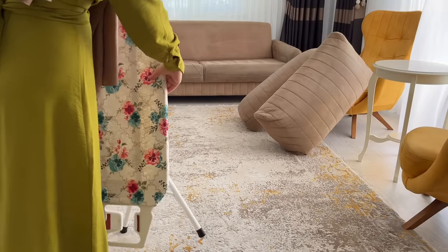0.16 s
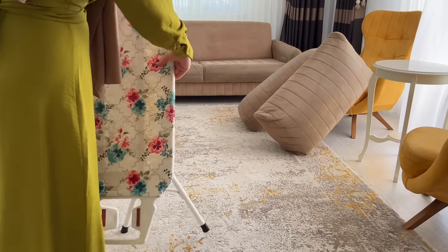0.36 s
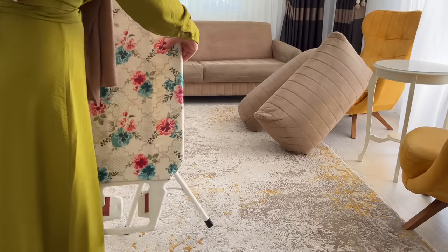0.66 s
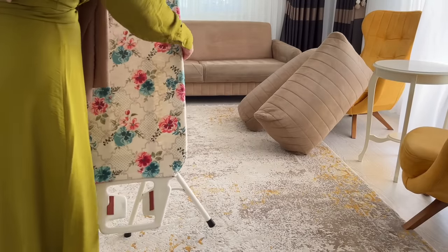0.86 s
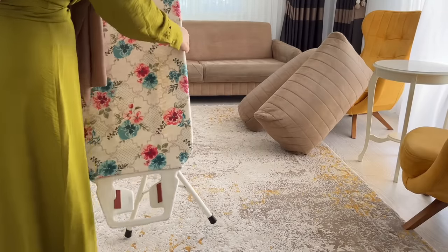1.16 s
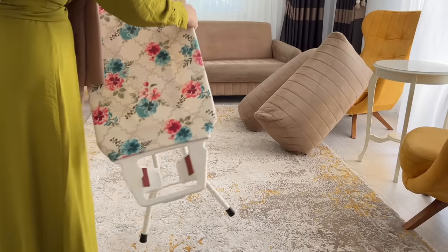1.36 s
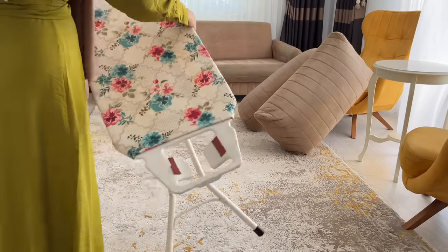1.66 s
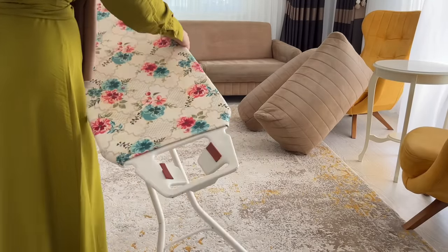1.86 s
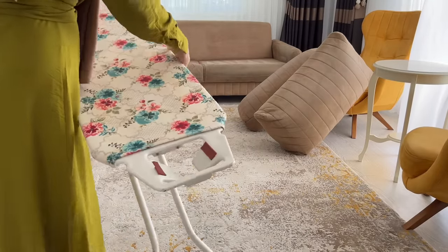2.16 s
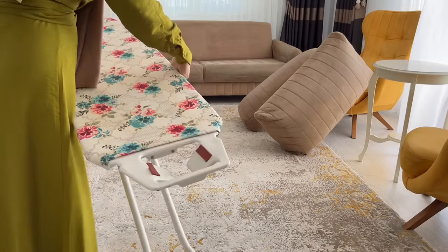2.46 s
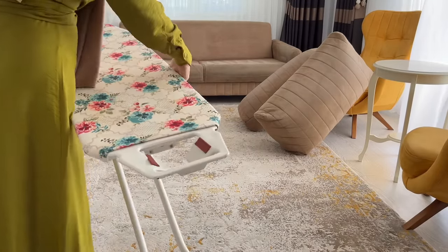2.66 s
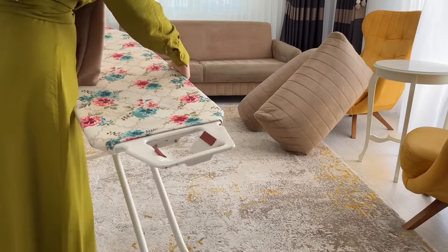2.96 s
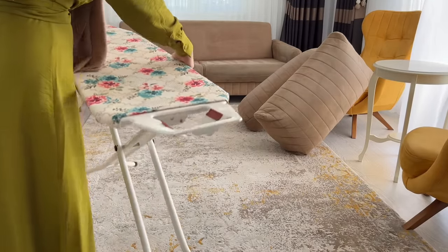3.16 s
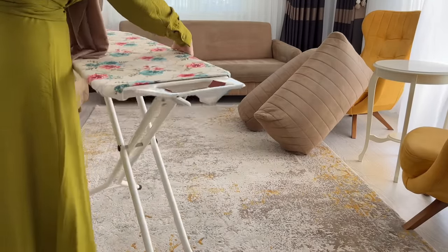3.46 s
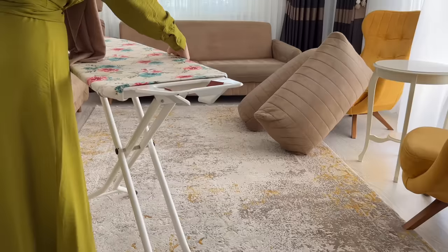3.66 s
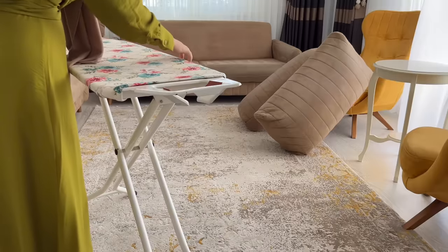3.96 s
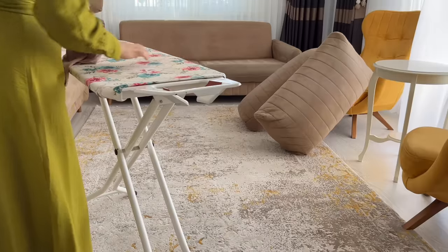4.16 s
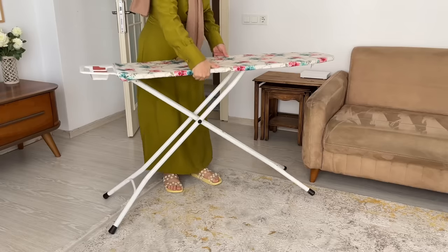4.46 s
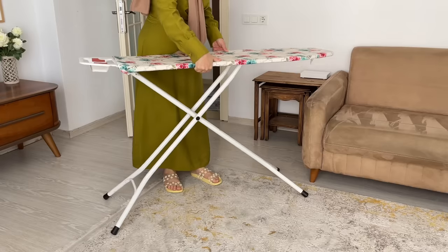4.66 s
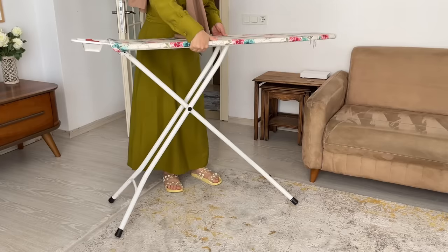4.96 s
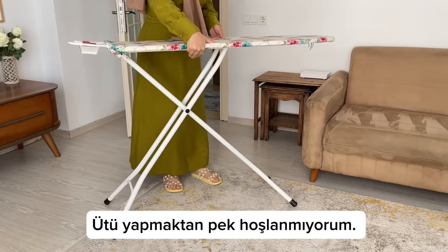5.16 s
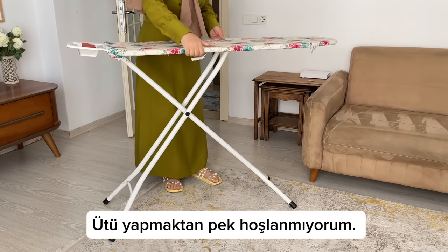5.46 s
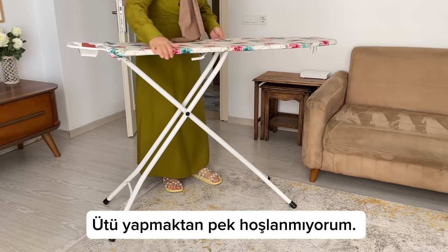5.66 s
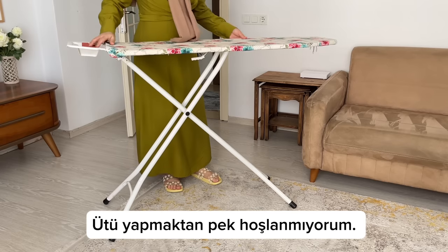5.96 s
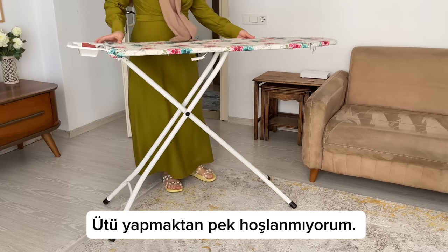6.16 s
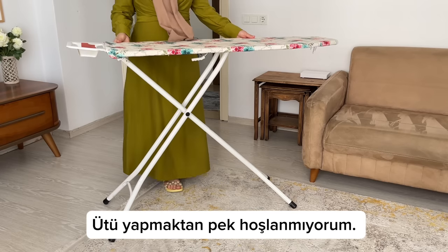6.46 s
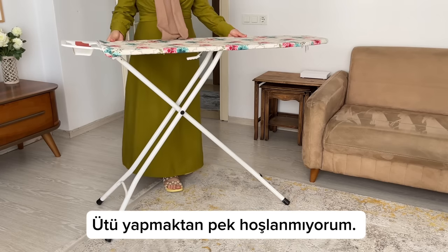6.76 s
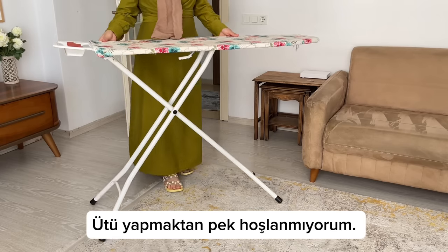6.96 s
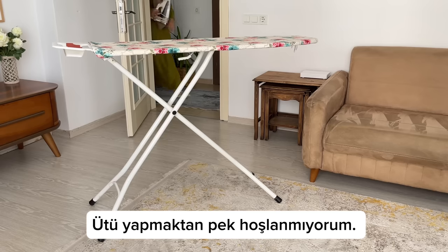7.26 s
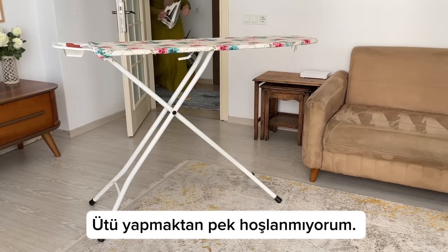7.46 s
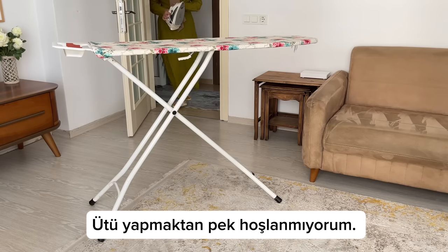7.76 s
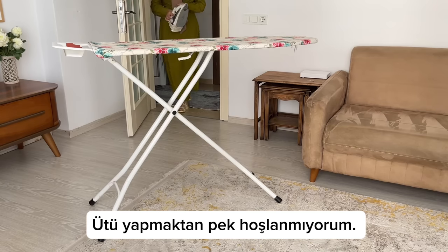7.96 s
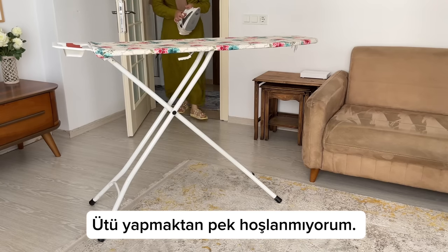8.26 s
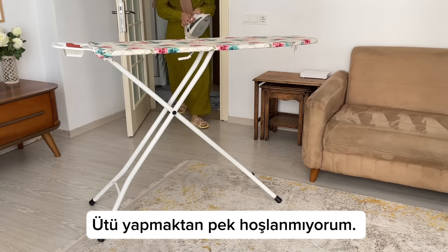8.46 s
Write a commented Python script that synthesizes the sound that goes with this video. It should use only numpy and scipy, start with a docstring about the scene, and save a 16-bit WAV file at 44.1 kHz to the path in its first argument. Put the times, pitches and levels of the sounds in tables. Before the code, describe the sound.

Metal legs scrape, catch and knock as an ironing board is set up in a living room; cloth rustles, soft footsteps follow over a faint low hum.

```python
"""Unfolding a steel ironing board

In a carpeted living room a leg bar scrapes along its rail in strokes, catches, knocks and rings faintly.
Scrapes are dense random contacts, blows are clicks with a dying rattle, and both ring the steel frame.
A foot lands as a falling tone; noise makes the rustling cloth, slipper steps, a short click at 7.02 s
and the room tone; sines make the hum. Reflections follow the direct sound, and the two channels
share part of the sound.
"""
import sys
import numpy as np
from scipy import signal
from scipy.fft import rfft, irfft, next_fast_len
from scipy.io import wavfile

SR = 44100
rng = np.random.default_rng(int(sys.argv[2]) if len(sys.argv) > 2 else 0)


def wav_record(signal):
    """Record a signal, one row per channel, as 16-bit PCM in the file named by sys.argv[1]."""
    frames = np.transpose(np.atleast_2d(signal))
    bounded = np.clip(frames, -1, 1)
    # unit amplitude maps onto the largest positive 16-bit level
    quanta = np.round(bounded * 32767).astype(np.int16)
    wavfile.write(sys.argv[1], SR, quanta)


N = 380141
SIZE = next_fast_len(N + SR)                            # transform length, with room for tails
HZ = np.maximum(np.arange(SIZE // 2 + 1) * SR / SIZE, 1)

# Levels are those of each source, before its filters and the room.
# Scrapes, blows and cloth have up to five parts, low to high: boom, knock, clang, body, hiss.
# Part levels are relative to the body; dullness raises the low parts.
BOOM_HZ, KNOCK_HZ, CLANG_HZ, HISS_HZ = 454, 1074, 2840, 7460   # crossovers between the parts

# room tone over time: time_s, middle_db, bass_db
TONE_LEVELS = [(0.0, -50, -54.5), (1.5, -52.5, -54.5), (2.4, -51, -50), (4.2, -50.5, -52),
               (5.4, -48.5, -55.5), (6.5, -48, -55), (6.9, -47, -51), (8.62, -46, -55)]
# colour of the room tone: pitch_hz, level_db (per Hz)
TONE_SPECTRUM = [(24, -36.5), (41, -3.5), (65, 0.5), (100, -1), (160, -6.5), (250, -11), (500, -17),
                 (790, -20), (1200, -19), (2000, -28.5), (3200, -37), (5000, -43), (7000, -60),
                 (12000, -61.5)]

# the hum over time: time_s, level_db
HUM_LEVELS = [(0.0, -45), (0.24, -54), (0.38, -36), (0.55, -52), (0.67, -36.5), (0.8, -50), (1.25, -47.5),
              (1.6, -51), (1.68, -40), (1.8, -53.5), (2.09, -39.5), (2.4, -44), (2.7, -48.5), (3.3, -46.5),
              (3.6, -54.5), (3.9, -48), (4.2, -56), (4.27, -41), (4.47, -40), (4.73, -48), (4.95, -40),
              (5.4, -40.5), (5.7, -35), (5.8, -41.5), (6.36, -38.5), (6.55, -56.5), (6.74, -43),
              (6.96, -38), (7.06, -46.5), (7.75, -52.5), (8.14, -44), (8.62, -45)]
# the hum's octave over time: time_s, level_db
OCTAVE_LEVELS = [(0, -63), (4.2, -60), (5.35, -57.5), (5.45, -51), (5.9, -49), (6.7, -52), (6.8, -65),
                 (8.62, -60.5)]
# settings of hum and ringing, which switch abruptly at each start:
# start_s, hum_hz, phase_waver_rad, upper_tone_hz, upper_tone_db, tube_drive_db, frame_ring_db
HUM_AND_RING_SETTINGS = [(0, 62.6, 0.49, 188, -77.5, -74.5, -45), (4.25, 69.6, .45, 206, -58, -84, -43),
                         (7.02, 64.63, .8, 203.5, -56, -88, -45)]

# clothes and hands on the cover, each a swell: peak_s, rise_s, fall_s, level_db, hiss_db
SWELLS = [(0.18, 0.24, .1, -63, -20), (0.93, 0.11, 0.2, -68, -9), (1.04, 0.027, 0.13, -61.5, -21),
          (1.88, .05, .03, -57, -16), (2.34, .1, .3, -65, -9), (2.46, .04, .15, -63, -10),
          (2.84, .03, 0.33, -64, -21), (2.96, .03, 0.19, -64, -20), (4.14, .15, 0.14, -82, 6),
          (5.321, .1, 0.32, -67, -20), (5.8, 0.47, 0.57, -56.5, -6.5), (6.1, .2, .2, -74.5, -3),
          (6.66, .04, 0.63, -67, -10), (6.93, 0.22, .12, -70.5, -3.5), (7.23, .06, 0.13, -73.5, 2.5),
          (7.68, 0.062, 0.26, -66, -10.5), (7.83, .03, 0.25, -73, -5), (8.04, .05, 0.12, -83, -6),
          (8.42, .04, 0.21, -75, -5), (8.54, 0.027, .15, -74, -15.5)]
SWELL_EDGE_DB = 26                                      # drop at one rise or fall time from the peak
SWELL_ROUND = 1.4                                       # 1 = pointed swell, 2 = bell
REST_DB, REST_HISS_DB = -88.0, -16                      # cloth between swells; hiss against that

# slipper steps, and a short click at 7.02 s where the sound switches abruptly:
# start_s, level_db, dullness_db, hiss_db
STEPS_AND_CLICK = [(6.499, -71.5, 30.5, -4), (6.6192, -33, 5.5, 6), (7.0198, -61, 10, 0.3),
                   (7.2624, -66, 20, 3), (7.675, -44, 15.5, 4.5), (8.3588, -69, 31, -8),
                   (8.4087, -54.5, 15, -0.6), (8.5283, -60, 18, -12.5)]
# boom, knock and clang of a blow, and how far each follows the dullness
STEP_PARTS_DB, STEP_DULL_SHARE = [0.3, 1, 9], [0.95, 1, 0.11]
KNOCK_PARTS_DB, KNOCK_DULL_SHARE = [-2, -2, -2], [0.91, 1, 0.5]

# a foot of the board lands on the carpet, one row:
# start_s, level_db, first_hz, last_hz, pitch_fall_s (time constant), t60_s
FOOT_LANDING = (2.5315, -20, 900, 270, .0032, .11)

# knocks and catches of the frame: start_s, level_db, dullness_db, hiss_db
FRAME_KNOCKS = [(0.2467, -24.5, -12.5, 2), (0.2665, -23, 0, 8), (0.62, -16, -2.5, 7),
                (0.7427, -18.5, -10.5, 4.5), (1.0228, -49.5, 13, -4), (1.6536, -61, 6, 7),
                (1.8974, -12, -6.5, 8), (1.9485, -17, -3.5, 7.5), (1.988, -18.5, -1, 4.5),
                (2.0262, -16, -2, 8.5), (2.0577, -9.5, -4, 3.5), (2.1102, -16, -8, 3),
                (2.1333, -14, -1, -1.5), (2.4335, -42.5, -8, 8), (2.5115, -39.5, 11.5, 1.5),
                (2.5386, -25, 5, 1.5), (2.6483, -36, 13, -9), (2.8228, -44.5, 14, -11),
                (2.9439, -50, 15, -14), (2.9896, -37.5, 7, -1.5), (3.021, -34.5, 5, -2.5),
                (3.0631, -23.5, -2, 8), (3.3918, -30.5, 12.5, 7.5), (3.492, -32, 5.5, 12),
                (4.519, -36.5, 4, -11), (4.5685, -29, -8, 5), (4.6402, -28.5, 3, 0.3),
                (4.7016, -30, -9.5, 8.5), (4.8524, -26.5, 4, 3), (5.0427, -24.5, 2, 12.5),
                (5.1599, -19, -4, 7), (5.3951, -58, 9, -8), (5.4325, -55, 9, -9), (6.0727, -56.5, 10, 4),
                (6.3575, -55, 15, 0.3), (6.8942, -52, 2.5, -8)]

# slides of the bar on its rail:
# start_s, rise_s, stop_s, first_db, last_db, dullness_db, clang_db, hiss_db, hollow_drive_db
BAR_SLIDES = [(0.16, 0.055, 0.28, -46, -39.5, 2, 2.5, -1, -56),
              (0.23, 0.058, .54, -24, -20.5, -0.1, 0.5, 7.5, -56.5),
              (0.5, 0.017, 0.67, -21, -26.5, 2, 3.5, 6.5, -57),
              (0.74, .006, 0.77, -29, -32.5, -0.5, 1, 6.5, -49),
              (1.888, 0.0082, 1.99, -21, -32, -0.5, 0.9, 4.5, -56.5),
              (1.97, 0.051, 2.1546, -26, -18.5, 0, 0.9, 6.5, -57.5),
              (2.529, 0.0067, 2.7, -37, -57.5, 11.5, 5.5, -1, -52),
              (2.95, 0.11, 3.14, -33.5, -26.5, 1.3, -0.3, 8.5, -55),
              (3.15, 0.018, 3.345, -29.5, -32, -0.5, -0.5, 7.5, -52),
              (3.488, 0.0053, 3.514, -51, -47.5, 9.5, 3, 10, -49),
              (4.246, 0.0061, 4.381, -25.5, -31, -1.5, 2, 8.5, -38),
              (4.5, .02, 4.76, -42, -29, 1.5, 2.5, 5, -51.5),
              (4.74, 0.033, 4.985, -28, -30.5, 0.3, 2, 8, -56.5),
              (5.035, 0.0084, 5.124, -34.5, -36, 3.5, -0.5, 7.5, -45),
              (5.154, 0.0061, 5.16, -14.5, -26, 1.5, 4, 7.5, -52)]
RISE_DB = 39.5                                          # a slide grows from this far below first_db
# fading speed after a slide stops, for boom, knock, clang, body, hiss: fade_db_per_s
SLIDE_FADES = [170., 256, 300., 310., 330.]
# boom and knock of a slide: level_db
SLIDE_LOW_PARTS = [1, 0.3]
# how far boom and knock follow the dullness: share
SLIDE_LOW_SHARES = [1.3, 0.9]

# colour of steel on steel: pitch_hz, level_db (per Hz)
STEEL_SPECTRUM = [(60, -15.5), (120, 0), (330, -7), (600, 2.5), (800, -1.5), (1300, -0.5), (2000, -0.5),
                  (3000, -1), (4700, 11.5), (6000, 1), (7200, -9), (10000, -14), (13000, -17.5),
                  (15700, -22.5)]
# modes (ringing tones) of frame and board: pitch_hz, drive_db, t60_s
FRAME_MODES = [(268, -15, 0.11), (327, -6.5, 0.13), (983, -16.5, 0.11), (1311.6, -5, 0.07),
               (1812, -11.5, 0.11), (1988, -11, 0.18), (2230, -21, .12), (2556, -24, .2), (3110, -9.5, .11),
               (3310, -14.5, 0.084), (3800, -18.5, .15), (4080, -13.5, .15), (4360, -12, 0.1),
               (4780, -15.5, 0.14), (4910, -20, 0.087), (5170, -13, 0.14), (5630, -17.5, .15)]
# two close, beating modes of the free leg tube: pitch_hz, t60_s
TUBE_MODES = [(3995, 1.0), (3992.4, 1.0)]
# modes of the hollow under the cover: pitch_hz, t60_s
HOLLOW_MODES = [(555, 0.1), (630, 0.07)]
KNOCK_HOLLOW_DB = -52.5                                 # how strongly knocks drive the hollow

# how long reflections last: pitch_hz, t60_s
ROOM_DECAY = [(125, 0.89), (250, 0.35), (500, 0.26), (1000, 0.26), (2000, .27), (4000, 0.26), (8000, 0.17),
              (14000, 0.13)]
# right channel against left channel: pitch_hz, likeness (0 to 1), phase_rad, left_louder_db
CHANNEL_PAIR = [(75, .98, 0, 1.8), (130, .94, 0, 2.7), (290, .8, 0, 3.2), (640, .35, 0, 4),
                (1400, .1, -.3, 1.5), (2100, .5, -.6, 2.2), (2800, .7, -1.1, 4), (3500, .62, -1.15, 6),
                (4500, .42, -.75, 8.4), (5500, .35, .4, 6.5), (6200, .55, 1.1, 3.5), (7000, .6, 1.6, 1.5),
                (7450, .75, 2.6, .5), (7650, .997, 3.14, 0), (9000, .997, 3.14, 0), (9400, .6, 4.0, 0),
                (10400, .6, 5.1, 0), (11000, .99, 6.28, 0), (13100, .99, 6.28, 0), (13600, .3, 7.6, 0),
                (14200, .95, 9.42, 0)]
CUTOFF_HZ = 15800


def amp(db):
    """Turn decibels into gain."""
    return 10 ** (np.asarray(db) / 20)


def unit(x):
    """Scale to rms 1."""
    return x / np.sqrt(np.mean(x ** 2) + 1e-20)


def in_time(rows):
    """Join the points of a time table with straight lines, one value per sample."""
    s, *columns = np.transpose(rows)
    return np.array([np.interp(np.arange(N) / SR, s, c) for c in columns])


def at_hz(points, hz=HZ):
    """Join the points of a frequency table along a logarithmic axis."""
    f, *columns = np.transpose(points)
    return np.array([np.interp(np.log(hz), np.log(f), c) for c in columns])


def current_settings():
    """Give the hum and ringing settings in force at every sample."""
    s, *columns = np.transpose(HUM_AND_RING_SETTINGS)
    row = np.searchsorted(s, np.arange(N) / SR, "right") - 1
    return np.array(columns)[:, row]


def drift(rate_hz):
    """Random slow wandering of rms 1: smoothed noise made at a twentieth of the sample rate."""
    r = np.exp(-40 * np.pi * rate_hz / SR)
    noise = rng.standard_normal(N // 20 + 4002)
    slow = signal.lfilter([1], [1, -2 * r, r * r], noise)[4000:]   # skip the filter's start-up
    return np.interp(np.arange(N) / 20, np.arange(len(slow)), unit(slow))


def colour(x, spectrum):
    """Filter to a dB shape without sounding early (minimum phase, by folding the cepstrum)."""
    cepstrum = irfft(at_hz(spectrum)[0] * np.log(10) / 20, SIZE)
    cepstrum[1:SIZE // 2] *= 2
    cepstrum[SIZE // 2 + 1:] = 0
    response = np.exp(rfft(cepstrum))
    return irfft(rfft(x, SIZE) * response, SIZE)[..., :N]


def joined(boom, knock, clang, body, hiss):
    """Cut each part to its own band, low to high, and add them."""
    parts = [(boom, BOOM_HZ, "low"), (knock, [BOOM_HZ, KNOCK_HZ], "band"),
             (clang, [KNOCK_HZ, CLANG_HZ], "band"), (body, [CLANG_HZ, HISS_HZ], "band"),
             (hiss, HISS_HZ, "high")]
    total = 0
    for x, hz, kind in parts:
        total = total + signal.sosfilt(signal.butter(3, hz, kind, fs=SR, output="sos"), x)
    return total


def parts_db(low_db, shares, dull_db, *upper_db):
    """Five part levels against the body: dullness shifts the low parts by their shares."""
    low_parts = np.array(low_db) + np.array(shares) * dull_db
    return np.array([*low_parts, *upper_db])


def grains(per_s, spread_db):
    """Random tiny contacts of uneven size and either sign, two unrelated draws."""
    unevenness = np.minimum(rng.exponential(1, (2, N)), 5)
    sizes = amp(spread_db * unevenness) * rng.choice([-1, 1], (2, N))
    touching = rng.random((2, N)) < per_s / SR
    return unit(sizes * touching)


def blows(table, low_db, shares, t60):
    """Each blow is a click and a short dying rattle; the click weighs most in the low parts."""
    out = np.zeros((5, 2, N + SR))
    t = np.arange(SR // 8) / SR
    rattles = rng.standard_normal((len(table), 2, len(t))) * amp(-60 * t / t60)
    click = np.array([8.3, 7.6, 2.8, 3.1, 2.2])[:, None, None] * (t == 0)
    for (s, level_db, dull_db, hiss_db), rattle in zip(table, rattles):
        i = round(s * SR)
        gain = amp(level_db + parts_db(low_db, shares, dull_db, 0, hiss_db))
        out[..., i:i + len(t)] += gain[:, None, None] * (rattle + click)
    return joined(*out[..., :N])


def ring(x, hz, t60):
    """One mode: a resonator in phase with its drive at its own pitch, dying 60 dB in t60 seconds."""
    r = amp(-60 / (max(t60, .01) * SR))
    w = 2 * np.pi * hz / SR
    return signal.lfilter([1, 0, -1], [1, -2 * r * np.cos(w), r * r], x + 1e-18)


def room_tone():
    """Dull noise from outside and the house, its bass and middle swelling apart."""
    middle_db, bass_db = in_time(TONE_LEVELS)
    noise = unit(colour(rng.standard_normal((2, N)), TONE_SPECTRUM))
    bass = signal.sosfilt(signal.butter(2, 400, fs=SR, output="sos"), noise)
    middle = noise - bass
    return amp(bass_db + 1.5 * drift(4.4)) * bass + amp(middle_db + 0.95 * drift(5.9)) * middle


def hum():
    """A low tone, its octave and an upper tone, all sines wavering in level and phase."""
    hz, waver, upper_hz, upper_db, *_ = current_settings()
    tones = [(hz, in_time(HUM_LEVELS)[0]), (2 * hz, in_time(OCTAVE_LEVELS)[0]), (upper_hz, upper_db)]
    total = 0
    for tone_hz, level_db in tones:
        gain = np.sqrt(2) * amp(level_db + 2.2 * drift(8.5))   # root 2 turns rms into peak
        phase = 2 * np.pi * np.cumsum(tone_hz) / SR + waver * drift(7.8)
        total = total + gain * np.sin(phase)
    return total


def rustle():
    """Fine soft fibres rub in clumps; each movement swells and dies."""
    t = np.arange(N) / SR
    body, hiss = amp(REST_DB), amp(REST_DB + REST_HISS_DB)
    for s, rise, fall, level_db, hiss_db in SWELLS:
        distance = np.where(t < s, (s - t) / rise, (t - s) / fall)
        swell = amp(level_db - SWELL_EDGE_DB * distance ** SWELL_ROUND)
        body = body + swell
        hiss = hiss + amp(hiss_db) * swell
    fibres = grains(per_s=20000, spread_db=-2.5) * amp(1.3 * drift(15.))
    soft = body * fibres
    return joined(0 * fibres, amp(0.1) * soft, amp(1.7) * soft, soft, hiss * fibres)


def steps_and_click():
    """Slipper steps and a short click at 7.02 s: clicks with dying noise, in the colour of the steel."""
    return colour(blows(STEPS_AND_CLICK, STEP_PARTS_DB, STEP_DULL_SHARE, t60=0.15), STEEL_SPECTRUM)


def landing():
    """A dull thud whose pitch drops as the bending wave spreads through the board."""
    s, level_db, first_hz, last_hz, fall, t60 = FOOT_LANDING
    t = np.maximum(np.arange(N) / SR - s, 0)
    extra_turns = (first_hz - last_hz) * fall * (1 - np.exp(-t / fall))
    phase = 2 * np.pi * (last_hz * t + extra_turns)
    return amp(level_db - 60 * t / t60) * np.sin(phase)


def knocks():
    """Steel knocks and catches: each is a click with a quickly dying rattle."""
    return blows(FRAME_KNOCKS, KNOCK_PARTS_DB, KNOCK_DULL_SHARE, t60=0.049)


def scrape():
    """Dense contacts stutter as the bar sticks and slips; returns the scrape and the hollow's drive."""
    grit = grains(per_s=11000, spread_db=2.0) * amp(2.0 * drift(30.) + 0.87 * drift(120.))
    gain, hollow_gain, t = np.zeros((5, 1, N)), np.zeros(N), np.arange(N) / SR
    for start, rise, stop, first_db, last_db, dull_db, clang_db, hiss_db, hollow_db in BAR_SLIDES:
        on = slice(round(start * SR), round(stop * SR) + SR // 3)   # leave time to fade
        times = [start, start + rise, max(stop, start + rise)]
        level_db = np.interp(t[on], times, [first_db - RISE_DB, first_db, last_db])
        fade_db = np.outer(SLIDE_FADES, np.maximum(t[on] - stop, 0))
        balance_db = parts_db(SLIDE_LOW_PARTS, SLIDE_LOW_SHARES, dull_db, clang_db, 0, hiss_db)
        parts = amp(level_db - fade_db + balance_db[:, None])
        gain[:, 0, on] = np.maximum(gain[:, 0, on], parts)   # the louder of overlapping slides
        hollow_gain[on] = amp(hollow_db)
    out = joined(*(gain * grit))
    return out, out * hollow_gain


def frame(x, hollow_drive):
    """Steel passes contact noise on and rings; each mode's drive wavers as the contact point moves."""
    *_, tube_db, ring_db = current_settings()
    rings = sum(ring(x * amp(drive_db + 2.6 * drift(4.)), hz, t60) for hz, drive_db, t60 in FRAME_MODES)
    tube = sum(ring(x * amp(tube_db), hz, t60) for hz, t60 in TUBE_MODES)
    hollow = sum(ring(hollow_drive, hz, t60) for hz, t60 in HOLLOW_MODES)
    return colour(x + amp(ring_db) * rings + tube + hollow, STEEL_SPECTRUM)


def room(x):
    """Direct sound plus a noise-like tail of reflections that dies band by band."""
    t, tail = np.arange(SR * 3 // 4) / SR, 0
    for hz, t60 in ROOM_DECAY:
        edges = [hz / np.sqrt(2), min(hz * np.sqrt(2), .45 * SR)]
        dying = rng.standard_normal((2, len(t))) * amp(-60 * t / t60)
        dying = dying * (t > .003)                      # reflections arrive after 3 ms
        tail = tail + signal.sosfilt(signal.butter(2, edges, "band", fs=SR, output="sos"), dying)
    tail = tail / np.sqrt(np.sum(tail ** 2, axis=1, keepdims=True))
    reflections = irfft(rfft(x, SIZE) * rfft(tail, SIZE), SIZE)[:, :N]
    return amp(-2.0) * x + amp(-7.0) * reflections


def scene():
    """Mix two channels; noise is drawn apart for each, the landing is common, the hum is in the first."""
    slides, hollow_drive = scrape()
    hits = knocks()
    board = frame(slides + hits, hollow_drive + amp(KNOCK_HOLLOW_DB) * hits) + landing()
    indoors = room(board + steps_and_click() + rustle())
    return indoors + room_tone() + hum() * [[1], [0]]


def record(dry):
    """The two channels share part of the sound, turned in phase on the right; the top is cut."""
    alike, turn, left_db = at_hz(CHANNEL_PAIR)
    margin = SR // 10                                   # the sound runs on smoothly past both ends
    padded = np.pad(dry, [(0, 0), (margin, margin)], "reflect", reflect_type="odd")
    first, second = rfft(padded, SIZE)
    shared = alike * np.exp(1j * turn) * first
    right = shared + np.sqrt(1 - alike ** 2) * second
    pair = irfft([first, right * amp(-left_db)], SIZE)
    top_cut = signal.cheby2(20, 60, CUTOFF_HZ, fs=SR, output="sos")
    return signal.sosfilt(top_cut, pair)[:, margin:margin + N]


dry = scene()
out = record(dry)
wav_record(out)
```